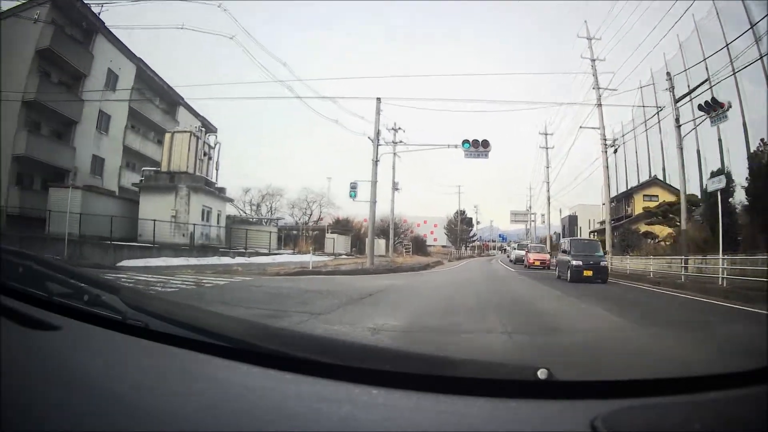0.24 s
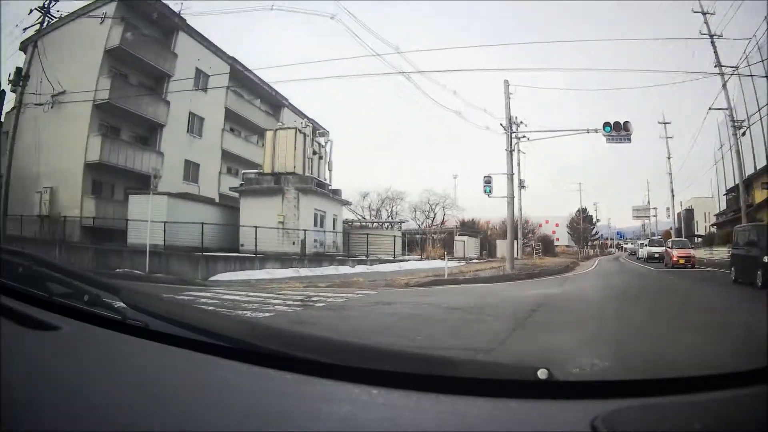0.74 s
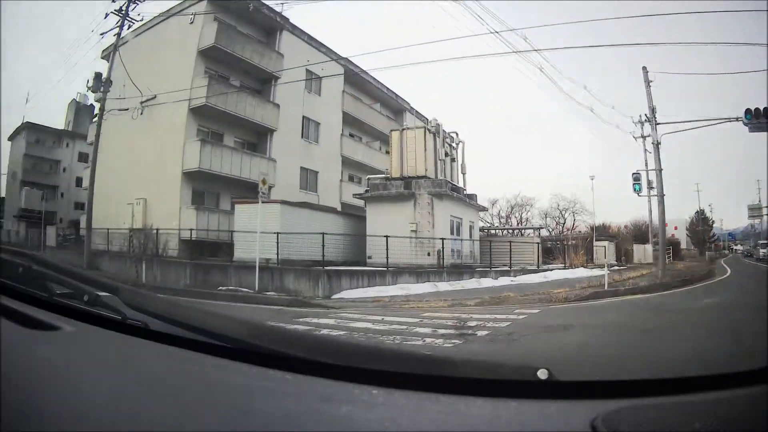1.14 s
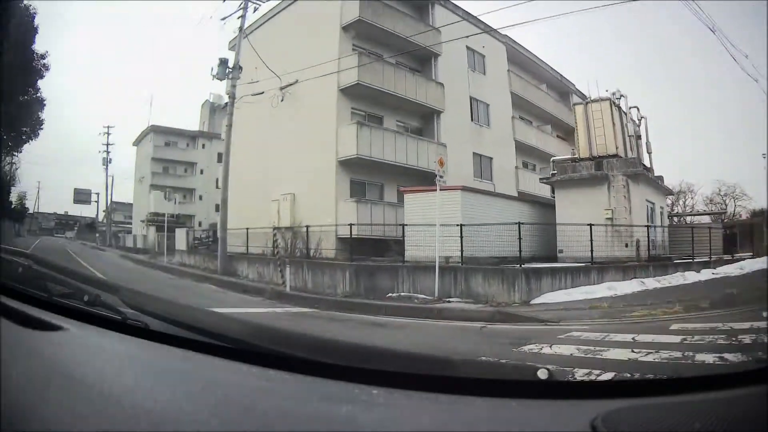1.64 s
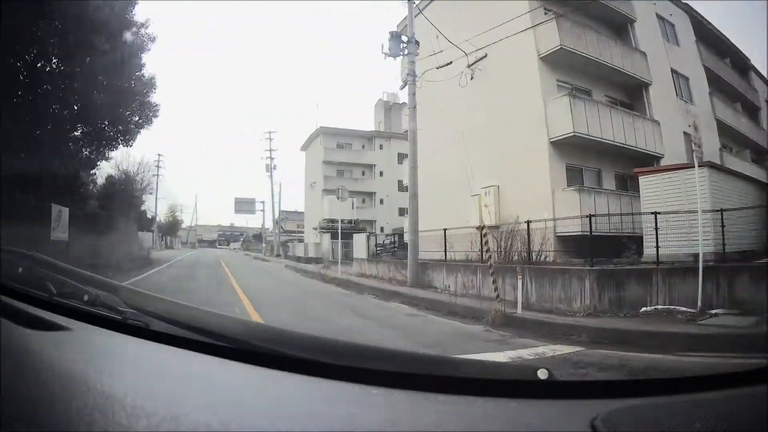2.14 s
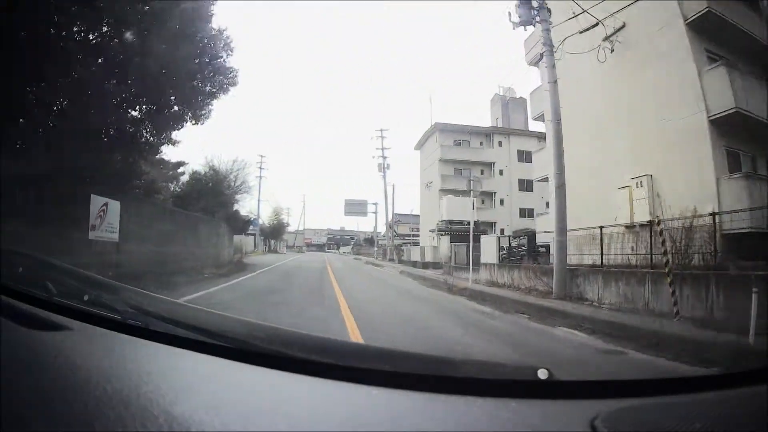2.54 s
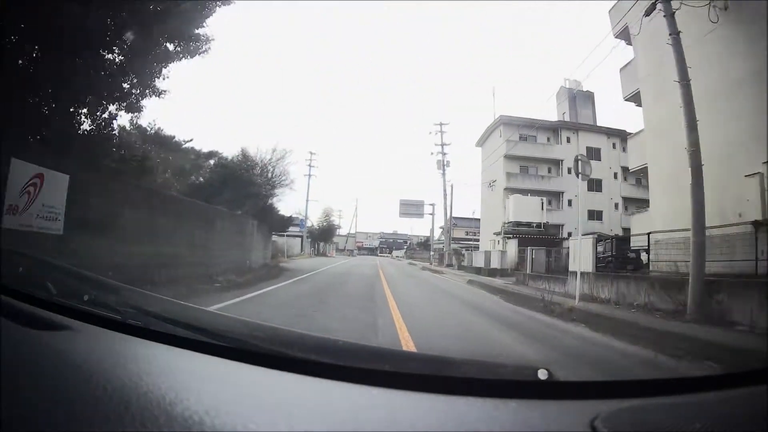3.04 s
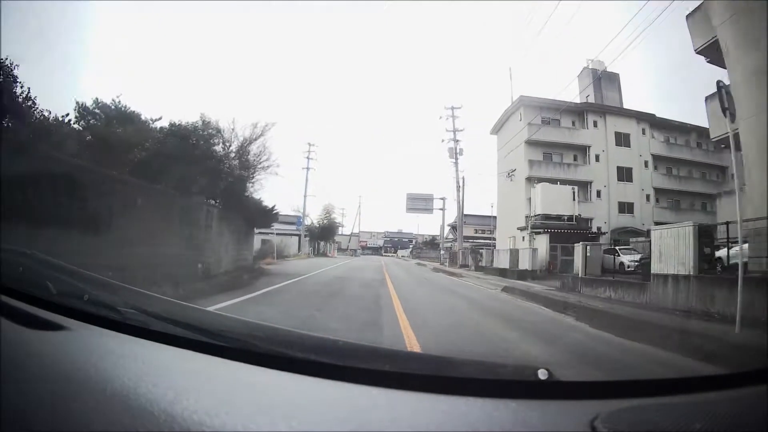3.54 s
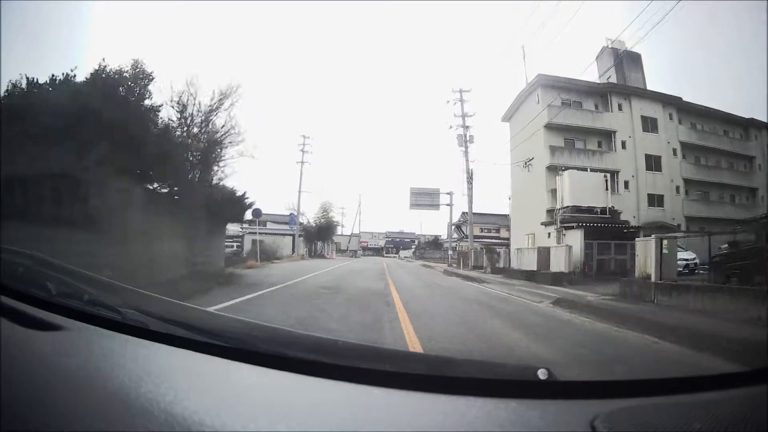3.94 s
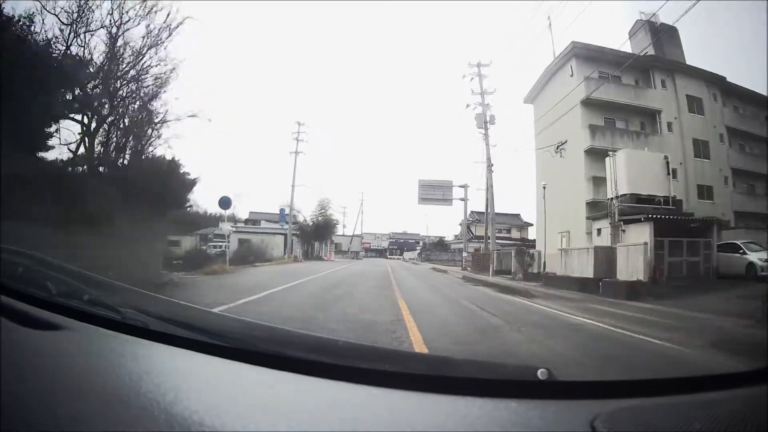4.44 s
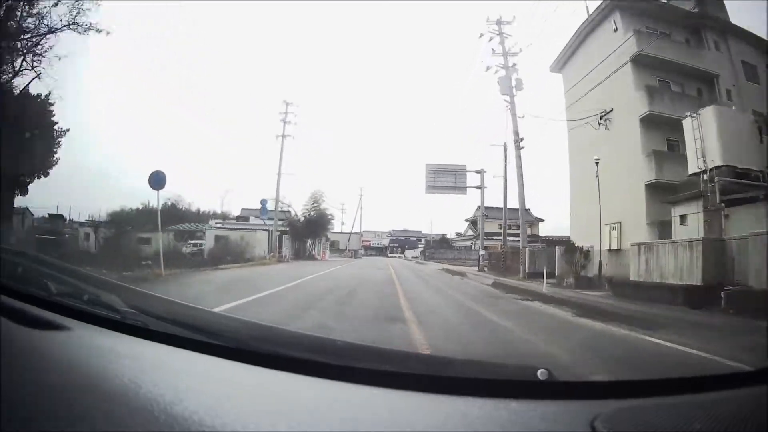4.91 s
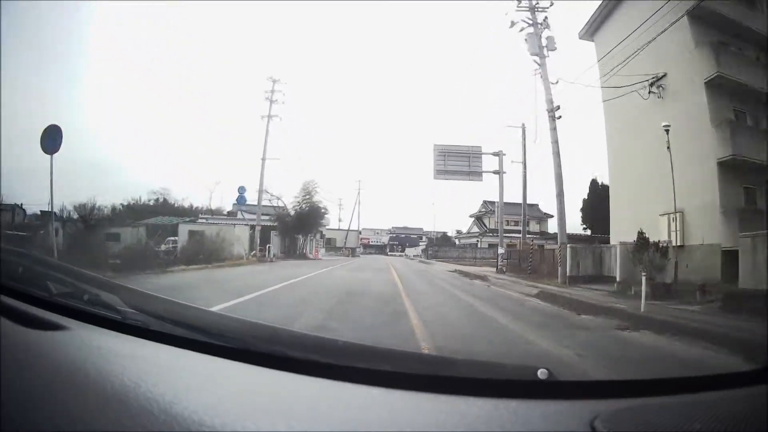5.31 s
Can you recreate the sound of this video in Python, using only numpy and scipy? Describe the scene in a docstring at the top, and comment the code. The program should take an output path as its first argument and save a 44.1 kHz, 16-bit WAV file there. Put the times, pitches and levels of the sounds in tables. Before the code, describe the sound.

Car cabin at low speed: blinker ticking, stalk clicks and a snap back, engine climbing and shifting up, then bumps boom and loose plastic rattles.

```python
"""A relay ticks over the hum and road drumming of a small car's cabin, heard from the windscreen.
The car rounds a corner slowly, then speeds up: stalk clicks and a snap back end the ticking.
Filtered noise makes the road, tyres, blower and palms; sine multiples of the firing rate make the engine,
which climbs and shifts up; short bursts make the clicks. On bumps the cabin booms and loose trim rattles."""
import sys
import numpy as np
from scipy import signal
from scipy.fft import rfft, irfft
from scipy.io import wavfile
from scipy.ndimage import uniform_filter1d

SR = 44100
rng = np.random.default_rng(int(sys.argv[2]) if len(sys.argv) > 2 else 0)


def bounce(signal):
    """Save signal as a 16-bit WAV file at the path given by the first command-line argument."""
    frames = np.transpose(np.atleast_2d(signal))
    limited = np.clip(frames, -1, 1)
    pcm = np.round(limited * 32767).astype(np.int16)
    wavfile.write(sys.argv[1], SR, pcm)


N = 245637
T = np.arange(N) / SR


def undb(db):
    """Decibels to gain."""
    return 10 ** (np.asarray(db) / 20)


def unit(x):
    """Scale to rms 1."""
    return x / np.sqrt(np.mean(x ** 2))


def noise():
    """White noise as long as the scene."""
    return rng.standard_normal(N)


def curves(table):
    """Each column of a table as a curve over time."""
    s, *columns = np.transpose(table)
    return [np.interp(T, s, column) for column in columns]


def walk(rate):
    """Random levels held 1 / rate s and smoothed twice; rms 1."""
    hold = int(SR / rate)
    steps = np.repeat(rng.standard_normal(N // hold + 1), hold)
    smooth = uniform_filter1d(uniform_filter1d(steps, hold), hold)
    return unit(smooth[:N])


def swell(middle, half):
    """A smooth rise and fall around a moment; peak 1."""
    return np.exp(-((T - middle) / half) ** 2)


def resonate(x, modes):
    """Pass x through steep-sided resonances that add in power; rms 1."""
    f = np.fft.rfftfreq(len(x), 1 / SR) + 1
    power = 0
    for hz, width, db in modes:
        detune = (f * f - hz * hz) / (f * width * np.pi / 2)
        power = power + undb(db) ** 2 / (1 + detune ** 2) ** 2
    return unit(irfft(rfft(x) * np.sqrt(power), len(x)))


def coloured(points):
    """Noise whose spectrum joins points of frequency and level; rms 1."""
    hz, db = np.transpose(points)
    f = np.fft.rfftfreq(N, 1 / SR) + 1
    colour = undb(np.interp(np.log(f), np.log(hz), db))
    return unit(irfft(rfft(noise()) * colour, N))


def blow(modes, t60, rise, size=8192):
    """A struck plastic part: its crowded modes swell within the contact time and die away."""
    t = np.arange(size) / SR
    shape = np.exp(-np.log(1000) * t / t60) * (1 - np.exp(-t / rise))
    ring = shape * resonate(rng.standard_normal(size), modes)
    # same energy for every random burst
    return ring * np.sqrt(np.sum(shape ** 2) / np.sum(ring ** 2)) / shape.max()


def knock(modes, rise, size=1024):
    """A light tap on a panel: a few damped cycles whose pitch depends on the spot touched; peak 1."""
    t = np.arange(size) / SR
    spot = 1 + 0.048 * rng.standard_normal()
    ring = np.zeros(size)
    for hz, width, db in modes:
        strength = undb(db + 5.7 * rng.standard_normal())
        ring += strength * np.exp(-np.pi * width * t) * np.sin(2 * np.pi * hz * spot * t)
    ring = ring * (1 - np.exp(-(t / rise) ** 2))
    return ring / np.abs(ring).max()


def add(out, s, x):
    """Mix x into out at time s."""
    i = int(s * SR)
    out[i:i + len(x)] += x[:N - i]


# the car slows for the corner and pulls away: t/s, speed/(km/h)
SPEED_CURVE = [(0, 16.2), (.75, 11.8), (1.2, 18.7), (1.7, 22.7), (2.5, 26.4), (3.2, 31.2), (4.3, 38.9),
               (5.57, 40)]
REFERENCE_KMH = 30  # speed at which the rolling levels hold


def rolling(db, growth_db):
    """Gain of a sound that grows by a fixed step in dB for each doubling of speed."""
    kmh, = curves(SPEED_CURVE)
    return undb(db + growth_db * np.log2(kmh / REFERENCE_KMH))


# bumps in the road: t/s, strength level/dB
ROAD_BUMPS = [(1.84, -16), (3.72, -18), (4.32, -8.5), (4.59, -14), (4.72, -6), (4.929, 0.5), (5.05, 0),
              (5.199, -0.5), (5.44, -13)]
BUMP_RISE_S, BUMP_DECAY_S = 0.05, 0.085


def jolt():
    """How hard the body shakes: each bump builds quickly and the suspension damps it."""
    shakes = []
    for s, db in ROAD_BUMPS:
        decay = np.exp(-np.abs(T - s) / BUMP_DECAY_S)
        shakes.append(undb(db) * np.where(T < s, swell(s, BUMP_RISE_S), decay))
    return np.linalg.norm(shakes, axis=0)


# heater blower in its ducts: f/Hz, width/Hz, level/dB
BLOWER_DUCT_MODES = [(161.5, 45, 0), (190, 26, 4.5), (270, 32, 0.5), (1030, 38, -16), (1056, 16, -4),
                     (1157, 41, -17), (1900, 130, -31)]


def blower():
    """Noise through duct resonances: a steady hollow hum with a breathy note near 1 kHz at any speed."""
    return undb(-48.0) * resonate(noise(), BLOWER_DUCT_MODES)


# resonances of the cabin air: f/Hz, width/Hz, level/dB
CABIN_AIR_MODES = [(44.5, 13, -8), (62, 18, -8.5), (80, 9, 1.5), (108, 7.3, -7)]
# resonances of the body panels: f/Hz, width/Hz, level/dB
BODY_PANEL_MODES = [(157.3, 23.4, -0.5), (194, 88, -5.5), (278.2, 25.2, 2), (358.4, 52, -1.5),
                    (447, 130, -7.5), (633.5, 106, -7.5)]
# resonances of the tyre tread: f/Hz, width/Hz, level/dB
TYRE_TREAD_MODES = [(905, 242, -0.5), (998, 80, 4.5), (1076, 42, -3), (1188, 31, -2.5), (1490, 445, -14),
                    (1880, 350, -22)]
# spectrum of the soft rush: f/Hz, level/dB
RUSH_SPECTRUM = [(600, -16.5), (1500, 15.5), (2200, 6.5), (3100, -3), (4000, 3.5), (5000, -4.5),
                 (6200, -3.5), (7100, -16), (9000, -14), (12000, -32), (16000, -38)]
# level at the reference speed (dB) and growth for each doubling of speed (dB)
BOOM_DB, BOOM_GROWTH_DB = -48.5, 7.5
DRONE_DB, DRONE_GROWTH_DB = -40, 9
TREAD_DB, TREAD_GROWTH_DB = -49.5, 7.5
RUSH_DB, RUSH_GROWTH_DB = -68.5, 4.5
# what a jolt of strength 1 adds (dB)
JOLT_BOOM_DB, JOLT_DRONE_DB, JOLT_RUSH_DB = -31, -33, -60.5
# the tyres scrub through the corner: middle (s), half length (s), level (dB)
CORNER_S, CORNER_HALF_S, SCRUB_DB = 1.48, 0.5, -52.5


def road():
    """The road surface shakes cabin air and panels; the tread sings near 1 kHz under a soft rush."""
    shake = jolt()
    boom_gain = np.hypot(rolling(BOOM_DB, BOOM_GROWTH_DB), undb(JOLT_BOOM_DB) * shake)
    boom = boom_gain * resonate(noise(), CABIN_AIR_MODES)
    drone_gain = np.hypot(rolling(DRONE_DB, DRONE_GROWTH_DB), undb(JOLT_DRONE_DB) * shake)
    drone = drone_gain * resonate(noise(), BODY_PANEL_MODES)
    scrub = undb(SCRUB_DB) * swell(CORNER_S, CORNER_HALF_S)
    grip = np.hypot(rolling(TREAD_DB, TREAD_GROWTH_DB), scrub)
    # the grain of the asphalt makes the tread flutter
    tread = grip * undb(0.94 * walk(70)) * resonate(noise(), TYRE_TREAD_MODES)
    rush_gain = np.hypot(rolling(RUSH_DB, RUSH_GROWTH_DB), undb(JOLT_RUSH_DB) * shake)
    rush = rush_gain * undb(walk(27)) * coloured(RUSH_SPECTRUM)
    return boom + drone + tread + rush


# hands sliding on the steering wheel: middle t/s, half length/s, centre f/Hz, level/dB
PALM_SWISHES = [(0.425, 0.11, 5740, -80.5), (1.127, 0.037, 2480, -70.5), (1.386, 0.009, 2450, -65.5),
                (1.716, 0.037, 2560, -71), (2.161, 0.081, 6800, -76), (2.53, 0.067, 8000, -81)]


def steering():
    """Palms brush the wheel as it is turned and let run back: short swells of band noise."""
    out = np.zeros(N)
    for s, half, hz, db in PALM_SWISHES:
        out += undb(db) * swell(s, half) * resonate(noise(), [(hz, 0.27 * hz, 0)])
    return out


# the relay pulling in: f/Hz, width/Hz, level/dB
RELAY_TICK_MODES = [(3420, 350, -5), (4080, 200, -10), (5040, 250, -1), (5800, 200, 0), (5900, 330, -2)]
# the relay dropping out: f/Hz, width/Hz, level/dB
RELAY_TOCK_MODES = [(2960, 220, -3), (3550, 150, 3), (4130, 270, -3), (4800, 250, -7), (5750, 500, -10),
                    (7600, 1800, -18.5)]
BLINK_START_S, BLINK_PERIOD_S, BLINK_ON_S = 0.031, 0.4716, 0.2205
TICK_DB, TOCK_DB = -62.5, -61


def relay(count):
    """The indicator relay pulls in and drops out once for each blink."""
    out = np.zeros(N)
    for s in BLINK_START_S + BLINK_PERIOD_S * np.arange(count):
        add(out, s, undb(TICK_DB) * blow(RELAY_TICK_MODES, t60=0.038, rise=0.0004))
        add(out, s + BLINK_ON_S, undb(TOCK_DB) * blow(RELAY_TOCK_MODES, t60=0.041, rise=0.0004))
    return out


# indicator stalk and its cancelling cam: t/s, click level/dB, steering column thud level/dB
STALK_CLICKS = [(0.4986, -48.5, -70), (0.5285, -57.5, -47), (1.9477, -50.5, -54), (2.222, -59, -54),
                (2.2339, -50.5, -30), (2.251, -55, -29.5), (2.262, -62, -36.5)]
# plastic of the stalk: f/Hz, width/Hz, level/dB
STALK_CLICK_MODES = [(1820, 320, 8), (2970, 600, -2), (4730, 460, 1.5), (6120, 660, -0.5),
                     (7900, 880, -6.5), (9100, 520, -8), (14200, 4000, -24)]
# steering column: f/Hz, width/Hz, level/dB
COLUMN_THUD_MODES = [(179, 94, 2), (280, 50, 8), (545, 330, 1.5), (830, 150, -8), (1290, 1020, -15.5),
                     (1740, 200, -7.5)]


def indicator():
    """The relay ticks and tocks; the stalk clicks over its cam and finally snaps back with a thud."""
    out = relay(count=5)
    for s, click_db, thud_db in STALK_CLICKS:
        add(out, s, undb(click_db) * blow(STALK_CLICK_MODES, t60=0.054, rise=0.00034))
        add(out, s, undb(thud_db) * blow(COLUMN_THUD_MODES, t60=0.058, rise=0.00035))
        # the body panels ring on after the thud
        add(out, s, undb(thud_db - 8.5) * blow(BODY_PANEL_MODES[:3], t60=0.33, rise=0.0091))
    return out


# body of the trim's knock: f/Hz, width/Hz, level/dB
TRIM_KNOCK_MODES = [(1414, 130, -1.5), (2180, 390, 7.5), (2360, 210, -10.5)]
# taps per second, level at the reference speed (dB), growth for each doubling of speed (dB)
TAPS_PER_S, TAP_DB, TAP_GROWTH_DB = 45, -59, 21
JOLT_TAP_DB, TAP_SCATTER_DB = -40.5, 3.5  # added by a jolt of strength 1; random spread


def taps():
    """Light trim taps at random moments, stronger with speed and on the bumps."""
    out = np.zeros(N)
    force = rolling(TAP_DB, TAP_GROWTH_DB) + undb(JOLT_TAP_DB) * jolt()
    for i in np.flatnonzero(rng.random(N) < TAPS_PER_S / SR):
        scatter = undb(TAP_SCATTER_DB * rng.standard_normal())
        add(out, i / SR, force[i] * scatter * knock(TRIM_KNOCK_MODES, rise=0.00089))
    return out


# loudest knocks of loose trim, before the gains below: t/s, knock level/dB, sharp tick level/dB
TRIM_RATTLE = [(4.2357, -39, -68), (4.347, -35, -67), (4.596, -34.5, -65), (4.6924, -42.5, -66),
               (4.8718, -32, -57), (4.9154, -35, -55), (4.9272, -32, -58), (4.955, -42, -55),
               (4.9739, -35, -58), (4.9912, -31, -51), (5.0183, -31.5, -47), (5.0287, -30, -54),
               (5.0549, -28.5, -55), (5.098, -29, -55.5), (5.112, -37, -55), (5.1731, -31, -51),
               (5.1961, -35, -48.5), (5.227, -29, -58), (5.2364, -39, -51), (5.4086, -39, -72)]
KNOCK_GAIN_DB, TICK_GAIN_DB = 1, 2.5
# edge of the trim's tick: f/Hz, width/Hz, level/dB
TRIM_TICK_MODES = [(4190, 1100, 7), (5960, 1200, -12), (8500, 3000, -26), (13000, 5000, -26.5)]
# short, faint bursts of very high hiss: t/s, level/dB
HIGH_HISS_BURSTS = [(5.058, -65), (5.067, -69), (5.207, -71)]
# chatter at the reference speed (dB), growth for each doubling of speed (dB), contacts per second
CHATTER_DB, CHATTER_GROWTH_DB, CHATTER_PER_S = -74, 7, 160
JOLT_CHATTER_DB = -49.5  # added by a jolt of strength 1


def dashboard():
    """Loose trim knocks on the bumps and chatters more with speed and shaking; faint high hiss bursts."""
    out = np.zeros(N)
    for s, knock_db, tick_db in TRIM_RATTLE:
        add(out, s, undb(knock_db + KNOCK_GAIN_DB) * knock(TRIM_KNOCK_MODES, rise=0.00079))
        add(out, s, undb(tick_db + TICK_GAIN_DB) * blow(TRIM_TICK_MODES, t60=0.0093, rise=0.00026))
    for s, db in HIGH_HISS_BURSTS:
        burst = blow([(11500, 1970, 0), (14800, 2000, -2)], t60=0.05, rise=0.002)
        add(out, s, undb(db) * burst)
    chatter_gain = rolling(CHATTER_DB, CHATTER_GROWTH_DB) + undb(JOLT_CHATTER_DB) * jolt() ** 1.84
    contacts = (rng.random(N) < CHATTER_PER_S / SR) * noise()
    chatter = resonate(contacts, TRIM_KNOCK_MODES) + undb(-21) * resonate(contacts, TRIM_TICK_MODES)
    return out + chatter_gain * chatter


# the engine climbs, then shifts up: t/s, firing rate f/Hz
FIRING_RATE = [(0, 79), (.8, 77.9), (1.48, 89.34), (1.7, 94.46), (2.15, 97.4), (2.5, 92.54), (3.05, 99),
               (3.6, 105.8), (4.1, 108.2), (4.4, 77), (4.8, 78.07), (5.57, 82.43)]
# engine harmonics, firing rate first: multiple of the firing rate, level/dB
ENGINE_ORDERS = [(1, -0.5), (2, 1.5), (3, -8), (4, -8.5), (5, -16.5), (6, -6), (7, -10), (8, -13),
                 (10, -16.5), (11, -12)]
# the throttle opens after the slowest point; levels closed and open at the reference speed
THROTTLE_S, THROTTLE_OPEN_S, COAST_DB, PULL_DB = 0.82, 0.77, -65, -49
# whine as the car pulls out of the corner: middle (s), half length (s), level (dB)
WHINE_S, WHINE_HALF_S, WHINE_DB = 1.55, 0.15, -52


def engine():
    """Wavering sine multiples of the firing rate swell with throttle and speed; the tenth whines briefly."""
    hz, = curves(FIRING_RATE)
    throttle = np.clip((T - THROTTLE_S) / THROTTLE_OPEN_S, 0, 1)
    phase = 2 * np.pi * np.cumsum(hz * (1 + 0.0031 * walk(20))) / SR
    hum = np.zeros(N)
    for multiple, order_db in ENGINE_ORDERS[1:]:
        waver = undb(order_db + 3.76 * walk(14))
        hum += waver * np.sin(round(multiple) * phase + rng.uniform(0, 2 * np.pi))
    # near 79 Hz the firing rate meets the cabin's air resonance and booms
    lift = 1 + 0.7 / (1 + ((hz - 79) / 4) ** 2)
    firing = lift * undb(ENGINE_ORDERS[0][1] + 1.5 * walk(12)) * np.sin(phase)
    whine = undb(WHINE_DB) * swell(WHINE_S, WHINE_HALF_S) * unit(np.sin(10 * phase))
    loudness = rolling(COAST_DB + (PULL_DB - COAST_DB) * throttle, growth_db=3.5)
    return loudness * (firing + hum) + whine


def scene():
    """Everything that reaches the windscreen, as one channel."""
    bed = blower() + road() + steering()
    parts = indicator() + taps() + dashboard()
    return (bed + parts + engine())[None]


TOP_HZ = 15800


def record(dry):
    """A small camera adds its own hiss and a faint high whistle, and cuts the deep bass and the top."""
    whistle = undb(-94.5) * resonate(noise(), [(14700, 200, 0)])
    hiss = undb(-80) * noise()
    bass_cut = signal.butter(2, 30, "high", fs=SR, output="sos")
    top_cut = signal.ellip(10, 0.2, 70, TOP_HZ, fs=SR, output="sos")
    thin = signal.sosfilt(bass_cut, dry + hiss + whistle)
    return signal.sosfilt(top_cut, thin)


dry = scene()
out = record(dry)
bounce(out)
```